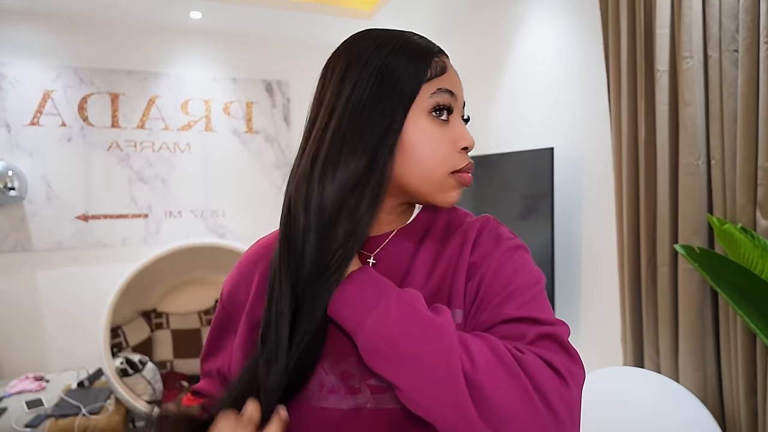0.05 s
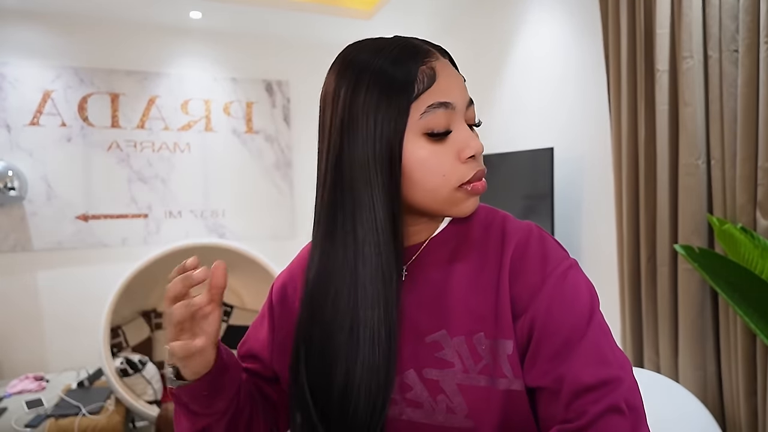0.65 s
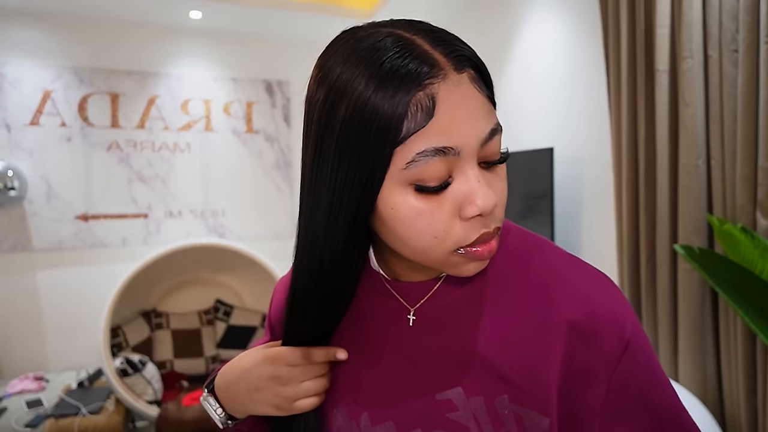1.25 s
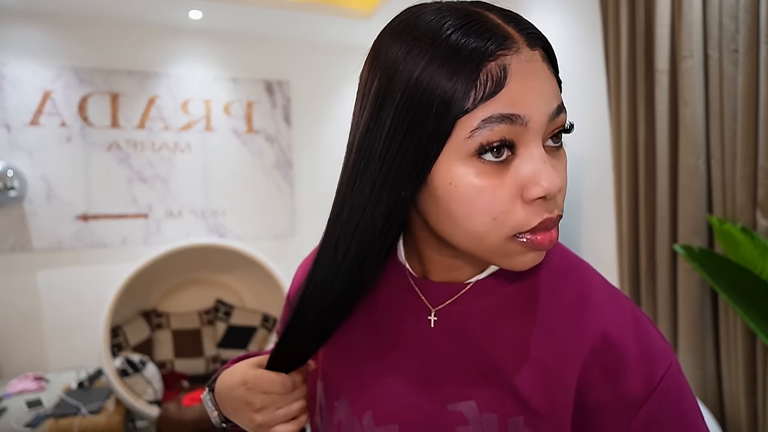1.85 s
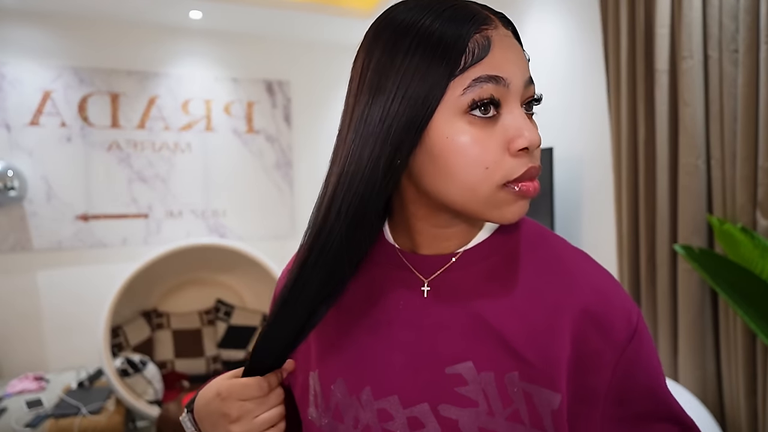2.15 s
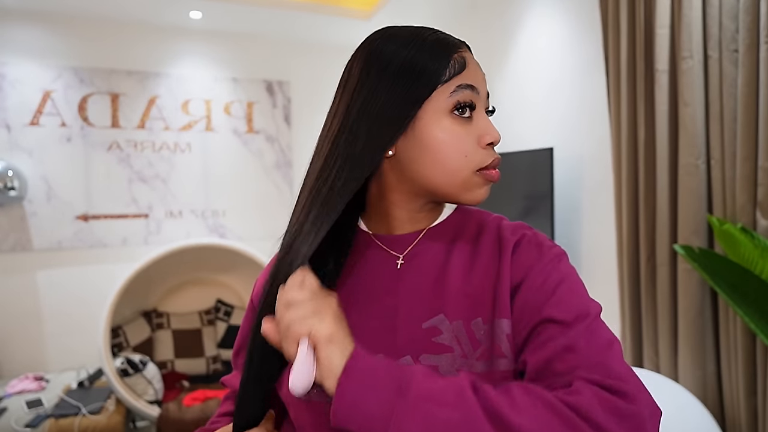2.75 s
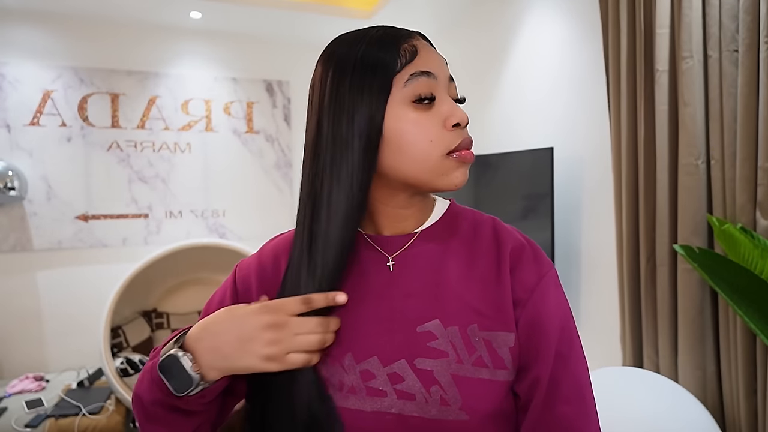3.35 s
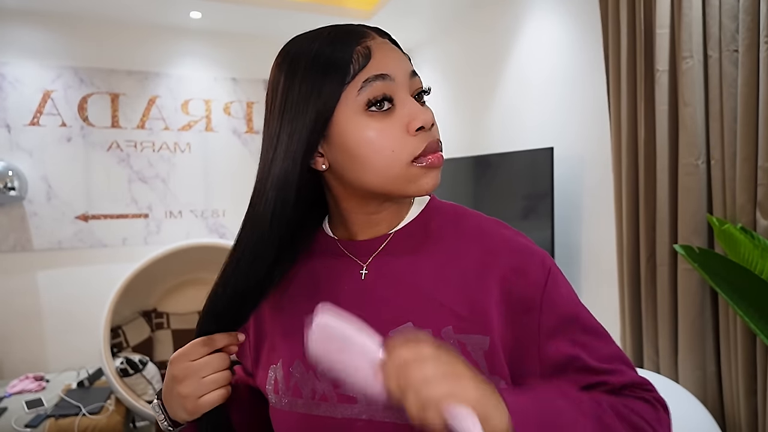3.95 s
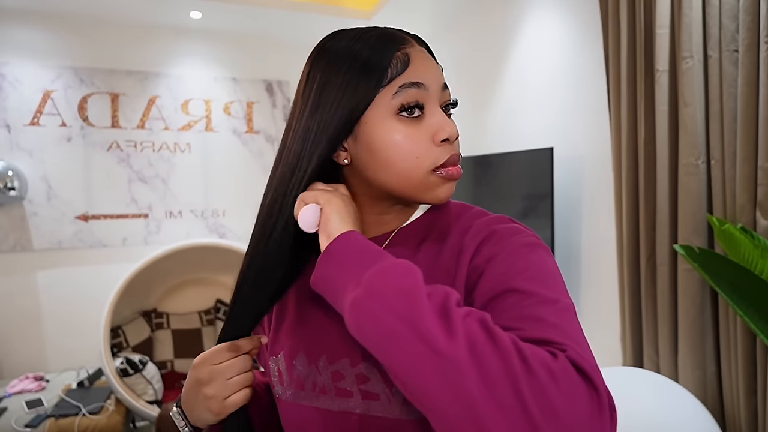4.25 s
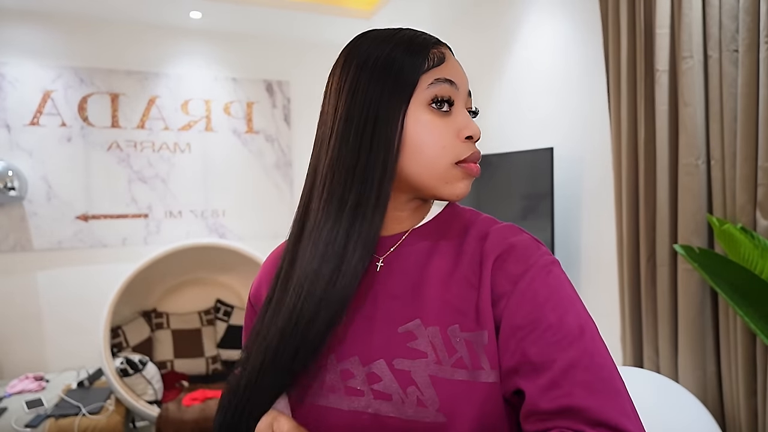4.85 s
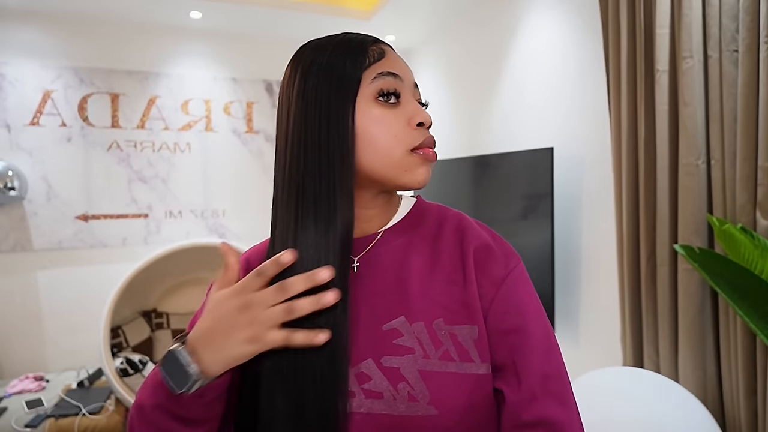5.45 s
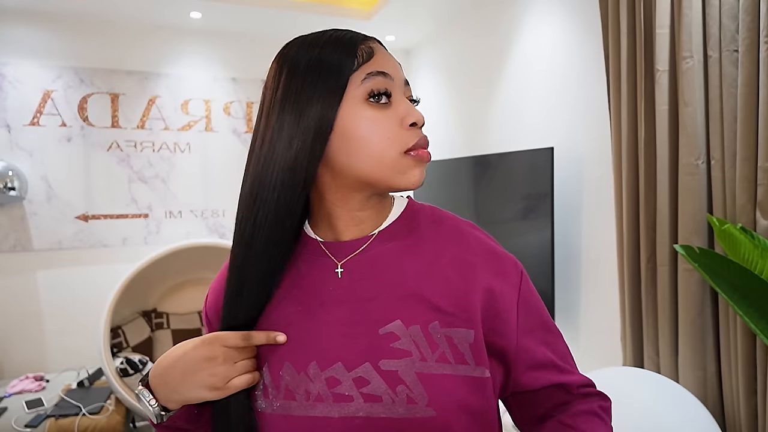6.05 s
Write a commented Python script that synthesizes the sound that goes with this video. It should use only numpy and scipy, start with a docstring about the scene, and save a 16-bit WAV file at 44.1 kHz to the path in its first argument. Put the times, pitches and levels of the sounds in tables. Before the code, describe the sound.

A brush crunches and rasps through long hair as sleeves swish, with one sharp knock on furniture in a small, quiet room.

```python
"""A brush runs through long hair in a small, quiet room: by stick-slip friction its bristles flick off
the strands, which crunch and rasp, and drum on the resonant pad. Caught strands snap free.
Sliding friction makes the hair hiss close by and the sweatshirt sleeves swish as a hand smooths it.
Farther off a hard object is nudged, knocks once sharply on furniture and settles, exciting its modes."""
import sys
import numpy as np
from scipy import signal
from scipy.fft import rfft, irfft
from scipy.io import wavfile

SR = 44100
rng = np.random.default_rng(int(sys.argv[2]) if len(sys.argv) > 2 else 0)


def materialize(psi):
    """Save the field psi as 16-bit PCM at rate SR to the path in sys.argv[1].

    A 1-D psi becomes a single channel; in a 2-D psi each row is a channel.
    """
    bounded = np.clip(np.atleast_2d(psi).T, -1, 1)
    quanta = np.round(bounded * 32767).astype(np.int16)
    wavfile.write(sys.argv[1], SR, quanta)


N = 268701
TIME = np.arange(N) / SR


def from_db(db):
    """Decibels to amplitude ratio."""
    return 10 ** (np.asarray(db) / 20)


def rms_one(x):
    """Normalisation to unit power."""
    return x / np.sqrt(np.mean(x ** 2) + 1e-20)


def at_bins(points, size):
    """Interpolation over log frequency, at the bins of a signal of this size."""
    hz, value = np.transpose(points)
    return np.interp(np.log(np.fft.rfftfreq(size, 1 / SR) + 1), np.log(hz), value)


def cut(x, hz, kind, order=2):
    """Butterworth filtering."""
    sections = signal.butter(order, np.clip(hz, 15, SR / 2 - 500), kind, fs=SR, output="sos")
    return signal.sosfilt(sections, x + 1e-18)


def stereo(pair, spectrum, coherence):
    """Partial coherence: two independent signals, as mid and side, set how alike left and right are."""
    size = pair.shape[1]
    alike = np.clip(at_bins(coherence, size), 0, 1)
    mid, side = rfft(pair) * np.sqrt([(1 + alike) / 2, (1 - alike) / 2])
    return irfft(np.array([mid + side, mid - side]) * from_db(at_bins(spectrum, size)), size)


def flutter(per_s, depth_db):
    """Random amplitude modulation: a gain that wanders."""
    knots = rng.standard_normal(N // 40)
    return from_db(depth_db * np.interp(TIME * per_s, np.arange(len(knots)), knots))


def slips(per_s, spread_db):
    """Stick-slip as a Poisson process: tiny impulses, a few much larger than the rest."""
    sizes = from_db(spread_db * np.minimum(rng.exponential(1, N), 4)) * rng.choice([-1, 1], N)
    return rms_one(sizes * (rng.random(N) < per_s / SR))


def ring(x, hz, t60_s):
    """Damped oscillator: a unit impulse starts a decaying sine of height 1."""
    r, w = from_db(-60 / (t60_s * SR)), 2 * np.pi * hz / SR
    return signal.lfilter([0, np.sin(w)], [1, -2 * r * np.cos(w), r * r], x + 1e-18)


def resonate(x, peaks):
    """Superposition of parallel resonances of alternating sign."""
    return sum((-1) ** k * from_db(db) * signal.lfilter(*signal.iirpeak(hz, hz / width, SR), x + 1e-18)
               for k, (hz, width, db) in enumerate(peaks))


def swell(s, rise_s, fall_s, rise_power=2.1, fall_power=1.85):
    """Friction sound follows speed: an envelope of height 1, pointed at power 1, a bell at power 2."""
    out = np.zeros(N)
    rising = (TIME > s - 6 * rise_s) & (TIME < s)
    falling = (TIME >= s) & (TIME < s + 6 * fall_s)
    out[rising] = np.exp(-((s - TIME[rising]) / rise_s) ** rise_power)
    out[falling] = np.exp(-((TIME[falling] - s) / fall_s) ** fall_power)
    return out


def movements(rows):
    """Incoherent addition: overlapping movements sum in power, one gain curve per level column."""
    rows = np.array(rows)
    shapes = np.array([swell(*timing) for timing in rows[:, :3]])
    return np.sqrt(from_db(rows[:, 3:].T) ** 2 @ shapes ** 2)


# spectrum of the room tone: frequency_hz, gain_db
ROOM_SPECTRUM = [(12, -30), (20, -14), (44, -13.5), (175, -5), (342, -9), (534, -10.5), (581, -13.5),
                 (881, -12.5), (1070, -14), (1300, -14.5), (1720, -15.5), (2400, -16), (2760, -16),
                 (11700, -26.5), (15500, -25.5)]
# left-right likeness of sound from all round: frequency_hz, coherence
DIFFUSE_COHERENCE = [(50, 0.86), (130, 0.89), (300, 0.53), (1400, 0.48), (3000, 0.54), (7000, 0.12),
                     (15000, 0.2)]

def room_tone(level_db=-59.5):
    """Diffuse field: faint steady noise arrives from all round."""
    noise = rng.standard_normal((2, N))
    return from_db(level_db) * rms_one(stereo(noise, ROOM_SPECTRUM, DIFFUSE_COHERENCE))


# spectrum of the wall reflections: frequency_hz, gain_db
WALL_SPECTRUM = [(80, -3), (300, 1.5), (550, -1.5), (900, 4), (1400, 2), (2300, 0.5), (4000, 2), (7000, 6),
                 (15000, -3)]

def room(x, coherence, wet_db, first_echo_s=0.00088, build_s=0.0042, t60_s=0.32):
    """Reverberation: dense reflections from near walls build quickly and decay exponentially."""
    t = np.maximum(TIME[:SR // 2] - first_echo_s, 0)
    envelope = (1 - np.exp(-t / build_s)) * from_db(-60 * t / t60_s)
    reflections = stereo(rng.standard_normal((2, len(t))), WALL_SPECTRUM, coherence)
    echo = reflections * envelope / np.linalg.norm(envelope)
    return x + from_db(wet_db) * signal.fftconvolve(np.atleast_2d(x), echo, axes=1)[:, :N]


# the object meets the furniture and drives a band, and the last row is a low thump of a chair: start_s,
# strength_db, low_hz, high_hz
CONTACTS = [(1.6233, -16.5, 1060, 2470), (1.699, -16.5, 800, 2010), (1.7045, -26, 910, 2040),
            (1.7408, -22, 1600, 3000), (1.789, -24.5, 200, 910), (1.796, -20.5, 300, 910),
            (1.813, 0, 120, 3930), (2.0749, -22, 545, 1900), (2.1151, -15, 70.6, 190)]
# broad resonances of the blunt thud: pitch_hz, width_hz, gain_db
THUD_RESONANCES = [(168, 120, -8), (301, 65, 0.5), (460, 220, -0.5), (670, 170, 4.5), (906, 380, 0),
                   (1370, 600, -2.5), (2190, 430, -5.5), (3480, 1800, -17.5)]
# ringing modes of the furniture: pitch_hz, gain_db, t60_s
FURNITURE_MODES = [(120, -43.5, 0.72), (186.5, -38, 0.48), (299.7, -17, 0.2), (399, -31, 0.32),
                   (470, -22.5, 0.14), (586, -31.5, 0.49), (617, -31, 0.3), (736, -13.5, 0.062),
                   (944, -31, 0.5), (972, -26, 0.28), (1215, -27, 0.082), (1453, -40, 0.28),
                   (1426, -32, 0.41), (1362, -27, 0.39), (1700, -27, 0.34), (2290, -26, 0.18),
                   (2694, -39.5, 0.43)]
# left-right likeness of wall echoes and farther sounds: frequency_hz, coherence
FAR_COHERENCE = [(100, 1), (800, 0.98), (1700, 0.96), (2600, 0.89), (4000, 0.95), (7000, 0.21),
                 (15000, .12)]

def knocks(thud_db=16.5, ring_db=-4, crack_db=-24.0, crack_hz=7000):
    """Impact excitation: each contact thuds and cracks into the room; the furniture's modes ring on."""
    force, clicks = np.zeros(N), np.zeros(N)
    for s, db, low_hz, high_hz in CONTACTS:
        click = from_db(db) * signal.unit_impulse(N, round(s * SR))
        force += cut(cut(click, low_hz, "high", order=1), high_hz, "low")
        clicks += click
    thud = room(from_db(thud_db) * resonate(force, THUD_RESONANCES), FAR_COHERENCE, wet_db=6.0)
    crack = room(from_db(crack_db) * cut(clicks, crack_hz, "high"), FAR_COHERENCE, wet_db=6.5)
    ringing = sum((-1) ** k * from_db(db) * ring(force, hz, t60_s)
                  for k, (hz, db, t60_s) in enumerate(FURNITURE_MODES))
    return thud + crack + from_db(ring_db) * ringing


# spectrum of rubbing cloth: frequency_hz, gain_db
SLEEVE_SPECTRUM = [(300, -7), (900, -10), (1600, -2), (2300, 0.5), (3000, -0.5), (4100, 0), (5200, -8),
                   (6500, -10.5), (9000, -14.5), (15500, -29)]

def sleeve_swish():
    """Friction noise: cloth rubs with a fine grain, farther off than the hair."""
    fibres = np.array([slips(per_s=12000, spread_db=1.5), rng.standard_normal(N)])
    return rms_one(stereo(fibres, SLEEVE_SPECTRUM, FAR_COHERENCE) * flutter(per_s=170, depth_db=1.34))


# spectrum of sliding hair: frequency_hz, gain_db
HAIR_SPECTRUM = [(2000, -49), (5000, 2), (7000, -3), (9000, 1), (11500, -3), (13500, -1.5), (15500, -6)]
# left-right likeness of near sounds: frequency_hz, coherence
NEAR_COHERENCE = [(100, 0.2), (700, 0.94), (1600, 1), (3200, .993), (5000, 0.95), (7000, 0.38),
                  (10000, 0.3), (15000, 0.36)]

def hair_hiss():
    """Gaussian friction noise: thousands of sliding hairs merge into a smooth hiss."""
    noise = rng.standard_normal((2, N))
    return rms_one(stereo(noise, HAIR_SPECTRUM, NEAR_COHERENCE) * flutter(per_s=91, depth_db=1.0))


# the arm slides sleeve and loose hair: fastest_s, rise_s, fall_s, sleeve_db, hair_db
ARM_MOVEMENTS = [(0.0, .05, 0.086, -50, -54), (.2, 0.31, 0.21, -60, -62), (.40, 0.014, 0.068, -57, -74),
                 (.61, 0.3, 0.21, -58.5, -65), (1.1, 0.29, 0.27, -66, -65), (1.195, 0.032, 0.022, -64, -56),
                 (1.307, 0.027, 0.033, -55, -53.5), (1.385, 0.059, .06, -63, -64),
                 (1.76, 0.15, 0.19, -53, -65), (2.11, 0.044, 0.037, -56, -78),
                 (2.21, 0.027, 0.088, -60, -61.5), (2.585, .012, 0.23, -67, -65.5),
                 (3.585, 0.021, 0.035, -46, -45.5), (3.7, 0.097, 0.071, -52.5, -72),
                 (5.73, 0.072, 0.063, -54, -53.5), (5.895, 0.075, 0.061, -59.5, -52)]

def sliding(stroke_hiss, stroke_sleeve_db=-8):
    """Sliding friction: arm movements and strokes both move cloth and hair, and add in power."""
    sleeve, hair = movements(ARM_MOVEMENTS)
    swish = np.hypot(sleeve, from_db(stroke_sleeve_db) * stroke_hiss) * sleeve_swish()
    return swish + np.hypot(hair, stroke_hiss) * hair_hiss()


# strands catch and snap free; the first row is the hand landing on the hair: start_s, strength_db, pitch_hz,
# tick_re_body_db, decay_s
STRAND_SNAGS = [(1.061, -43.5, 2260, -22, 0.039), (1.308, -33, 3150, -17, 0.0056),
                (1.388, -39.5, 1960, -19, 0.0046), (2.101, -42, 2800, -17, .003),
                (2.575, -41.5, 2200, -8.5, 0.0035), (3.003, -27, 1270, -5.5, 0.0078),
                (3.221, -30, 1460, -2, .0022), (3.235, -30, 1013, -9, 0.0013),
                (3.293, -31, 1400, -8, 0.0028), (3.325, -33, 890, -15, .005),
                (3.328, -30, 1700, -1.5, 0.0026), (3.439, -34, 1510, -6, 0.011),
                (3.505, -28, 1050, -9, .016), (3.532, -22.5, 1590, -7.5, 0.0053),
                (3.558, -23, 1610, -10, .0047), (3.572, -29.5, 1090, -2, 0.0034),
                (3.623, -21.5, 2190, -26, .001), (3.704, -30, 2270, -8, 0.0035),
                (4.782, -35, 991, -13, 0.0027), (4.813, -22.5, 590, -16, 0.0011),
                (4.845, -29.5, 1700, -3, 0.002), (4.899, -31, 1300, -17, 0.0045),
                (5.033, -28, 1192, -5, 0.0016), (5.121, -36.5, 1290, 1, .003),
                (5.172, -30.5, 780, -7, 0.0052), (5.282, -32, 1090, -3, 0.0025), (5.3, -26, 696, -11, .002),
                (5.341, -29, 1110, -7, .004), (5.502, -34, 1280, 5, 0.0017),
                (5.547, -30.5, 1580, -2.5, 0.0023), (5.684, -24.5, 546, -14, 0.0028),
                (5.733, -30.5, 550, -11, 0.0053), (5.972, -30.5, 3380, -12, 0.015)]

def snags(level_db=-3.0, tick_hz=(3400, 5100), band_ratio=1.51, notch_hz=2950, notch_q=3.4):
    """Release transient: caught strands let go in a dying burst, with a thin tick above a notch; the hand's
    touch sounds the same way."""
    out, t = np.zeros(N), TIME[:SR // 6]
    for s, db, hz, tick_db, decay_s in STRAND_SNAGS:
        burst = rng.standard_normal(len(t)) * np.exp(-t / decay_s)
        body = cut(burst, [hz / band_ratio, hz * band_ratio], "band")
        tick = cut(burst, tick_hz, "band", order=3)
        snap = body / abs(body).max() + from_db(tick_db) * tick / abs(tick).max()
        at = round(s * SR)
        out[at:at + len(t)] += from_db(db + level_db) * snap[:N - at]
    return signal.lfilter(*signal.iirnotch(notch_hz, notch_q, SR), out)


# tangles in the brush's path: centre_s, half_length_s, extra_crunch_db, extra_drumming_db
HAIR_TANGLES = [(3.239, 0.041, 12.5, 8), (3.29, 0.024, 12, 6.5), (3.332, 0.028, 12, 13),
                (3.523, 0.029, 11.5, 9), (3.574, .02, 14.5, 11), (3.613, 0.015, 11, 6),
                (3.712, 0.013, 9.5, 7), (4.828, 0.062, 1, 3.5), (5.028, 0.024, 5, 4.5),
                (5.124, 0.018, 5.5, 6.5), (5.18, 0.021, 4, 6.5), (5.329, 0.028, 1, 7.5),
                (5.42, .015, 5.5, 4), (5.648, 0.017, 5, 3), (5.685, 0.014, 1.5, 6), (5.739, 0.008, 1, 8)]

def tangle_drag():
    """Drag: tangles resist the stroke and briefly raise the gains of crunch and drumming."""
    shapes = np.array([swell(s, half_s, half_s) for s, half_s, *_ in HAIR_TANGLES])
    return from_db(np.array(HAIR_TANGLES)[:, 2:].T @ shapes)


# brush and hand strokes down the hair:
# fastest_s, rise_s, fall_s, rasp_db, pad_db, hiss_db, pad_pitch_ratio, rasp_pitch_ratio
HAIR_STROKES = [(1.067, 0.01, 0.057, -56.5, -59.5, -72, 0.98, .75),
                (2.91, 0.16, 0.28, -57.5, -52.5, -53, .87, 0.94),
                (3.44, 0.18, 0.24, -55, -51.5, -53.5, 0.99, 1.05),
                (4.57, .15, 0.13, -61, -58, -57, 1.05, .86),
                (4.81, 0.18, 0.59, -52.5, -50.5, -53.5, 0.99, .9),
                (5.36, 0.077, 0.096, -55, -53.5, -58, 1.0, 1.05),
                (5.645, 0.13, 0.098, -50.5, -45, -54.5, 0.95, 1.08),
                (5.986, 0.026, 0.091, -49.5, -66.5, -49, 0.97, 1.06)]

def stroke_gains(rasp_share=0.62, hiss_share=0.41):
    """Amplitude envelopes of pad, crunch, rasp and hiss; the last two share a tangle's extra crunch."""
    rasp, pad, hiss = movements([row[:-2] for row in HAIR_STROKES])
    crunch_drag, pad_drag = tangle_drag()
    crunch = np.sqrt(pad * rasp) * crunch_drag
    return pad * pad_drag, crunch, rasp * crunch_drag ** rasp_share, hiss * crunch_drag ** hiss_share


def pressed(x, pitch_ratios):
    """Frequency scaling: the sound runs a little higher or lower with the way each stroke presses."""
    rate = np.interp(TIME, [row[0] for row in HAIR_STROKES], pitch_ratios)
    return np.interp(np.cumsum(rate) % N, np.arange(N), x)


# resonances of the brush pad, the crunching strands and their fine rasp: pitch_hz, width_hz, gain_db
# (each stroke scales the pad and rasp frequencies by its pitch ratios)
PAD_RESONANCES = [(490, 110, -2.5), (619, 65, -3), (735, 44, 2), (861, 40, -4), (963, 46, -6.5)]
STRAND_RESONANCES = [(1030, 160, -1.5), (1251, 71, -1.5), (1440, 174, -0.5), (1840, 127, -1),
                     (2170, 260, -2.5)]
RASP_RESONANCES = [(2680, 1400, -3), (4020, 570, 0.5), (4340, 260, 2.5), (5250, 1430, -6.5)]

def brushing(pad_gain, crunch_gain, rasp_gain, crunch_db=-1, rub_db=-19):
    """Stick-slip excitation: flicking bristles drive resonances of pad and hair, over a dull rub."""
    grip = flutter(per_s=110, depth_db=2.5)
    pad = resonate(grip * slips(per_s=3200, spread_db=4.0), PAD_RESONANCES)
    strands = resonate(grip * slips(per_s=4900, spread_db=3.0), STRAND_RESONANCES)
    scrape = resonate(grip * slips(per_s=9800, spread_db=4.5), RASP_RESONANCES)
    rub = from_db(rub_db) * rms_one(cut(grip * slips(per_s=1000, spread_db=0.5), [170, 380], "band"))
    *_, pad_ratios, rasp_ratios = np.transpose(HAIR_STROKES)
    drumming = pressed(rms_one(cut(pad, 400, "high", order=4)), pad_ratios)
    crunch = from_db(crunch_db) * rms_one(cut(strands, [700, 2500], "band"))
    rasp = pressed(rms_one(cut(scrape, [1800, 6300], "band")), rasp_ratios)
    return pad_gain * (drumming + rub) + crunch_gain * crunch + rasp_gain * rasp


def scene():
    """Superposition: close, nearly dry hair and more reverberant knocks over a steady room tone."""
    tone = room_tone()
    pad, crunch, rasp, hiss = stroke_gains()
    close = brushing(pad, crunch, rasp) + sliding(hiss) + snags()
    return room(close, NEAR_COHERENCE, wet_db=-10.5) + knocks() + tone


def record(dry, cutoff_hz=15750):
    """Band limiting: a steep elliptic low-pass removes the highest treble."""
    return signal.sosfilt(signal.ellip(12, .1, 70, cutoff_hz, fs=SR, output="sos"), dry)


dry = scene()
out = record(dry)
materialize(out)
```